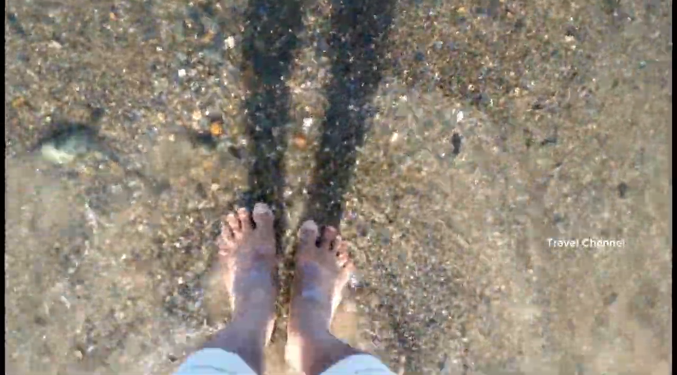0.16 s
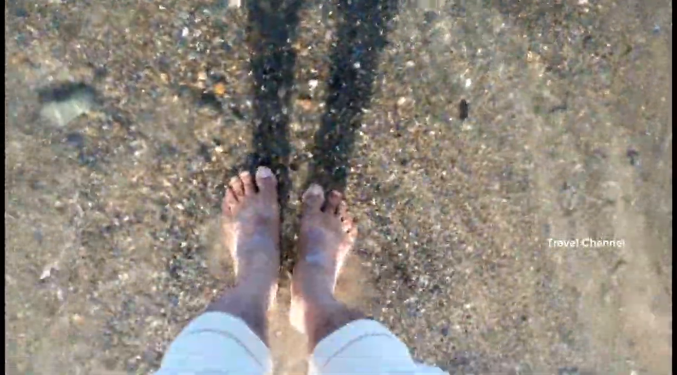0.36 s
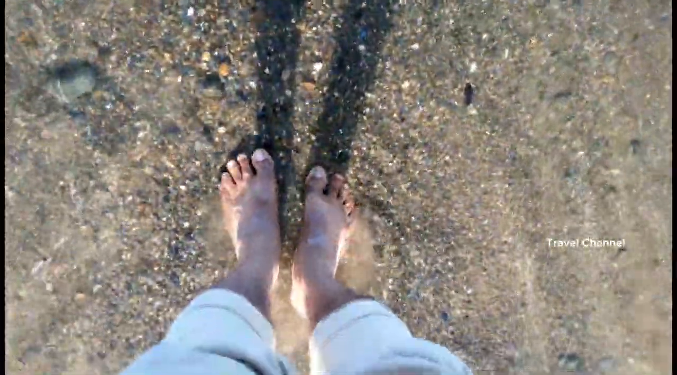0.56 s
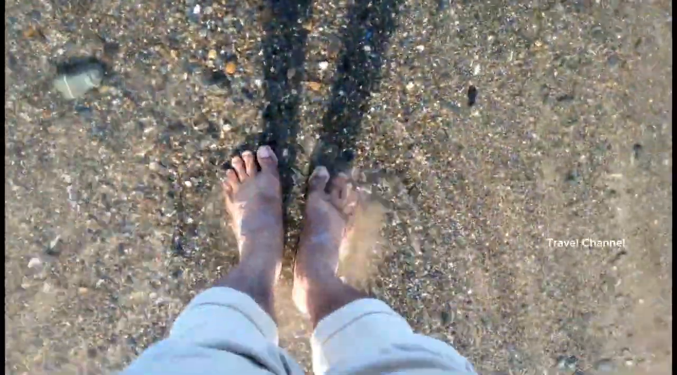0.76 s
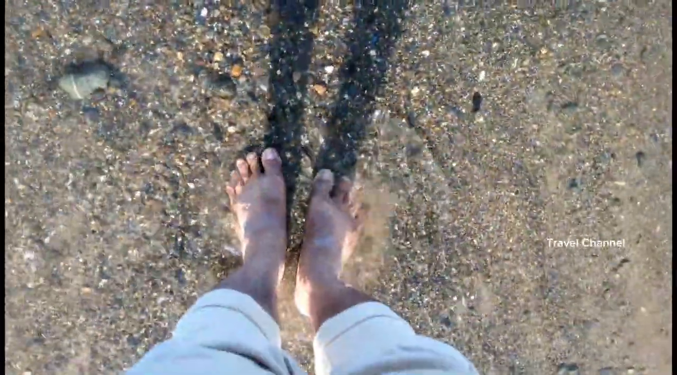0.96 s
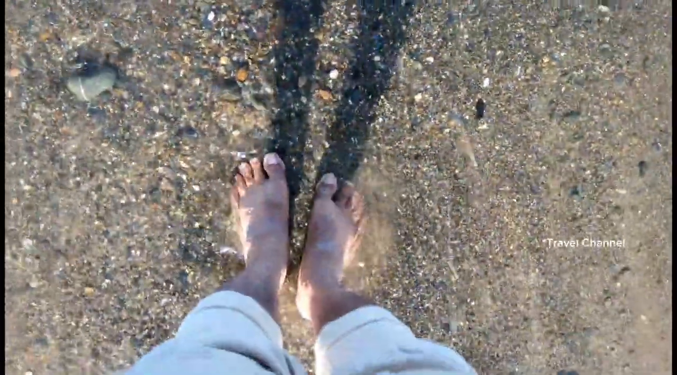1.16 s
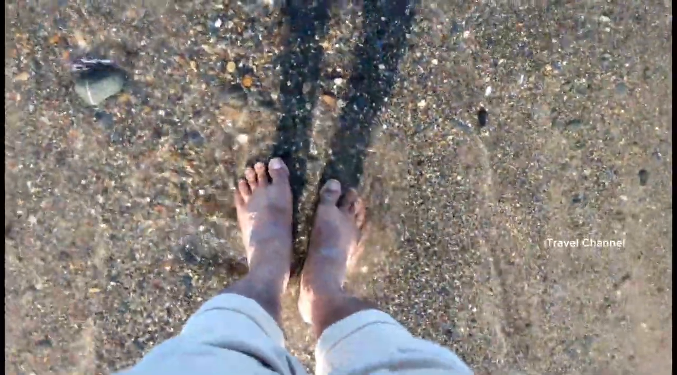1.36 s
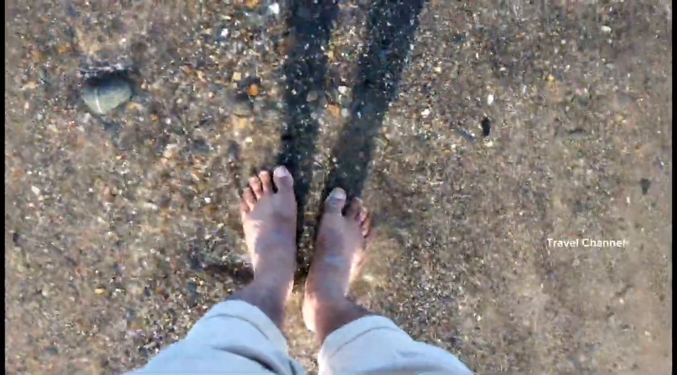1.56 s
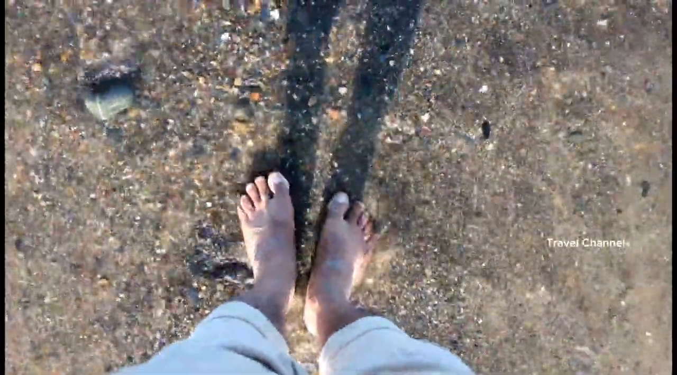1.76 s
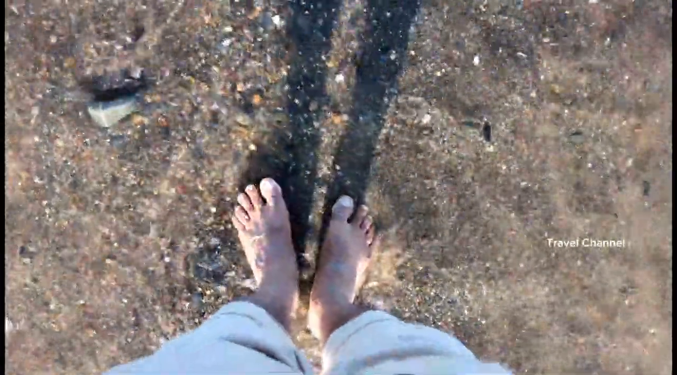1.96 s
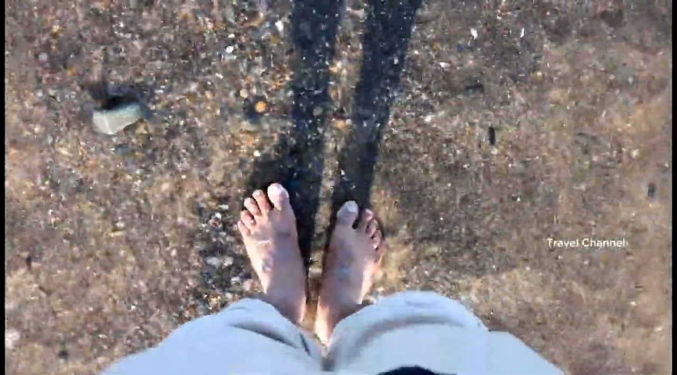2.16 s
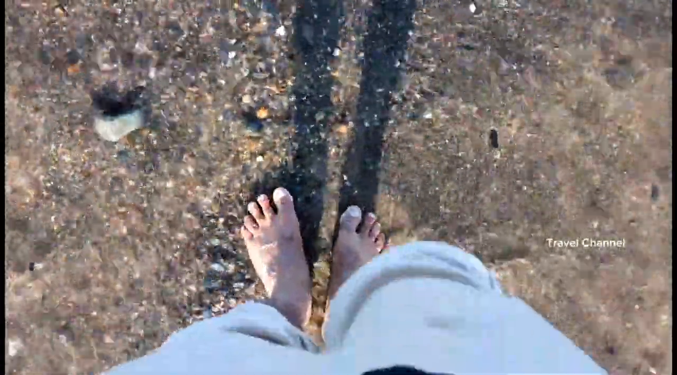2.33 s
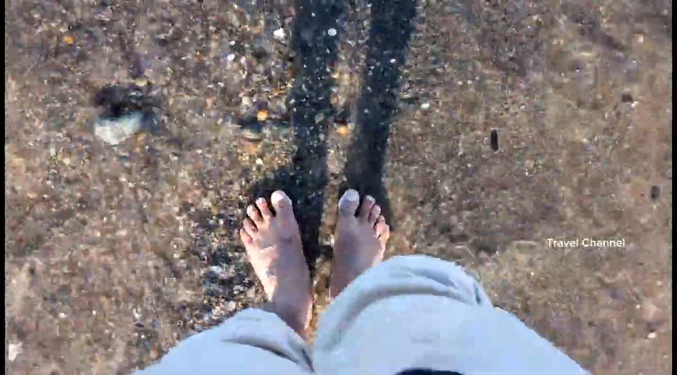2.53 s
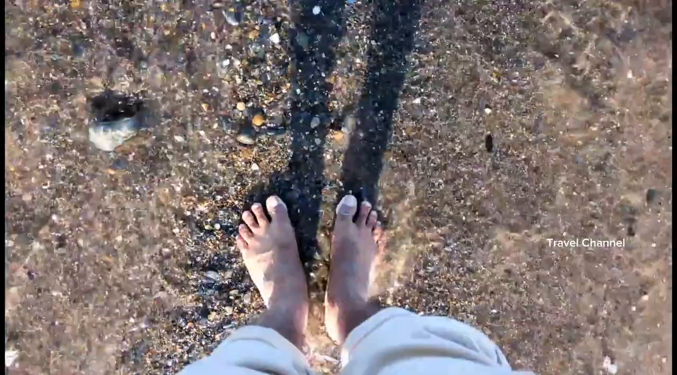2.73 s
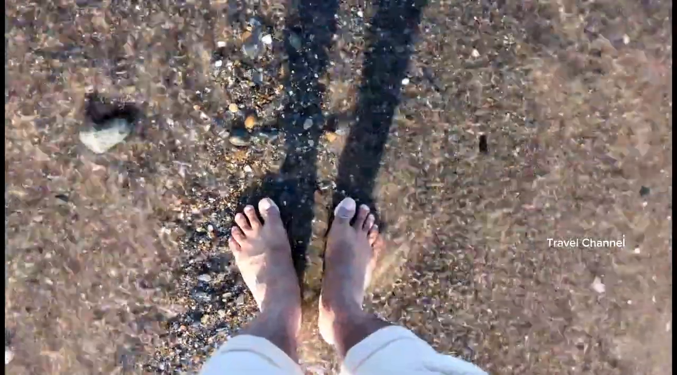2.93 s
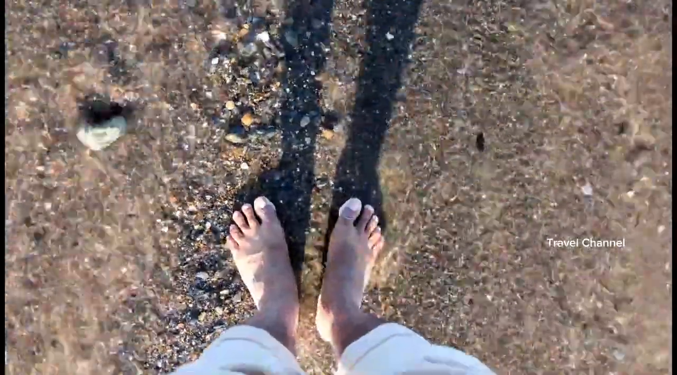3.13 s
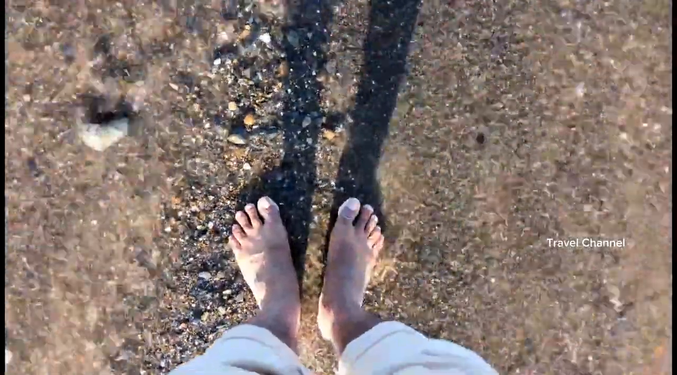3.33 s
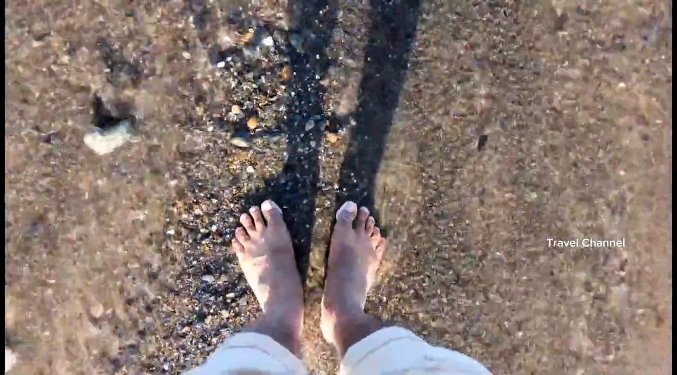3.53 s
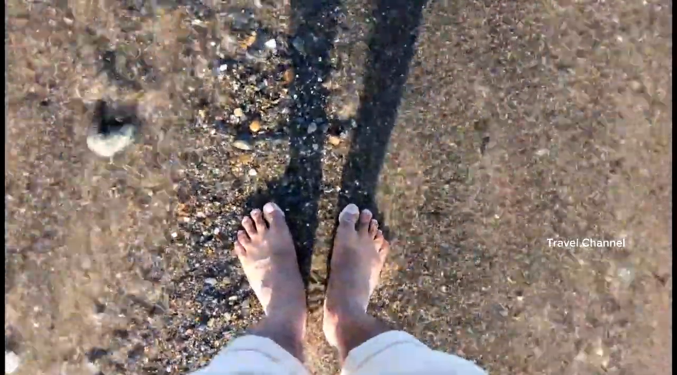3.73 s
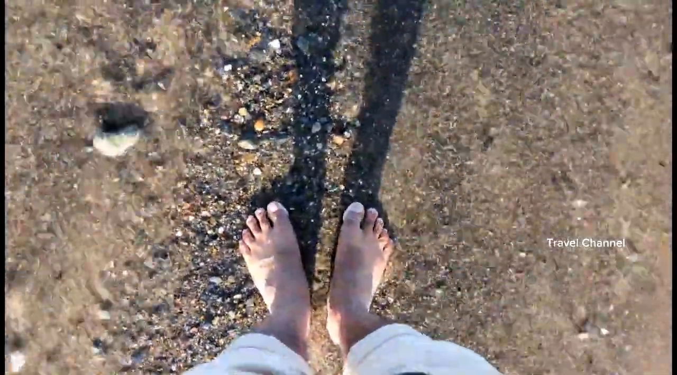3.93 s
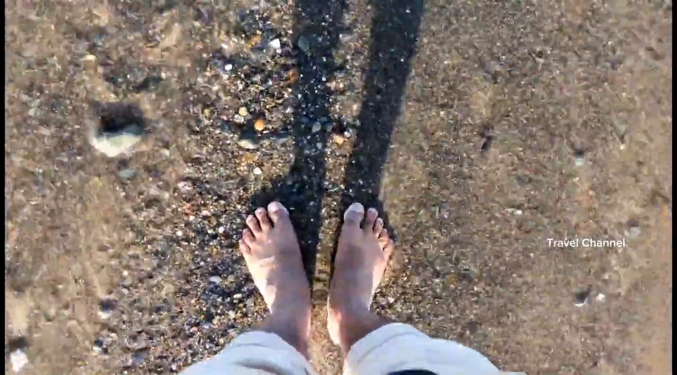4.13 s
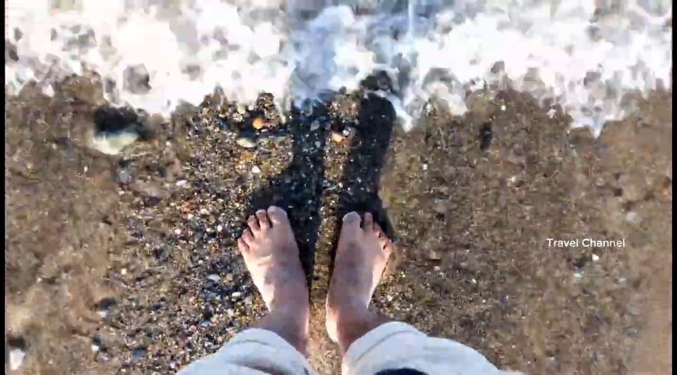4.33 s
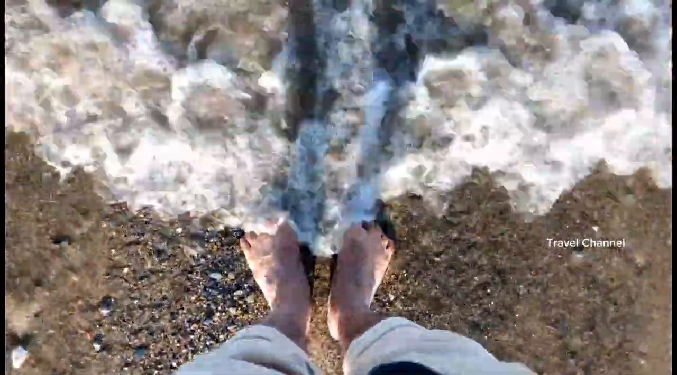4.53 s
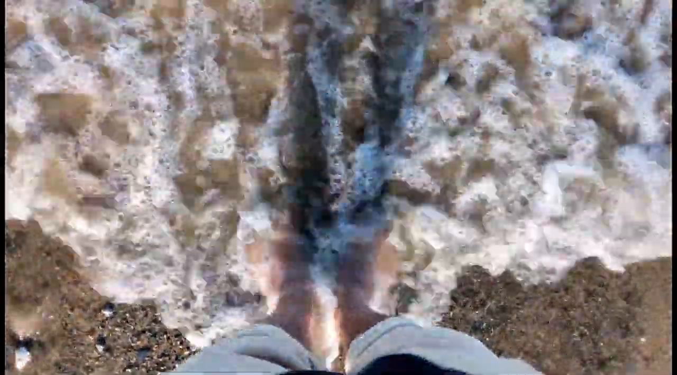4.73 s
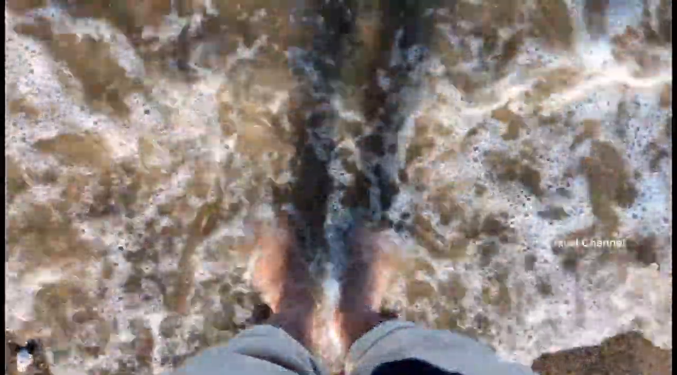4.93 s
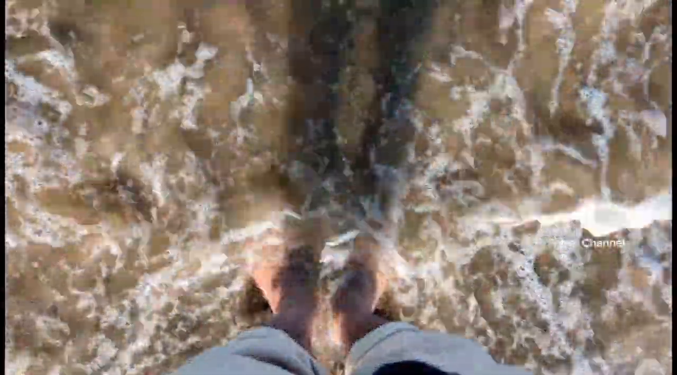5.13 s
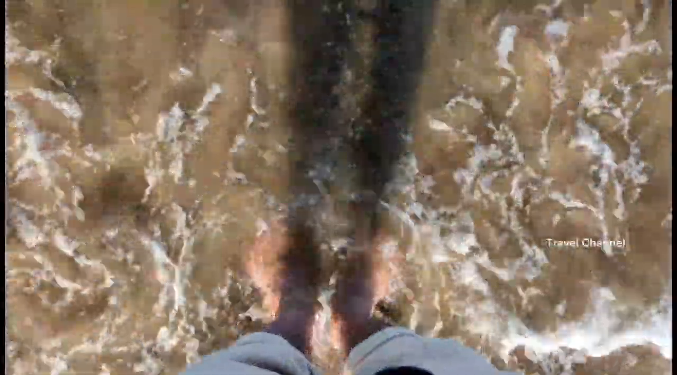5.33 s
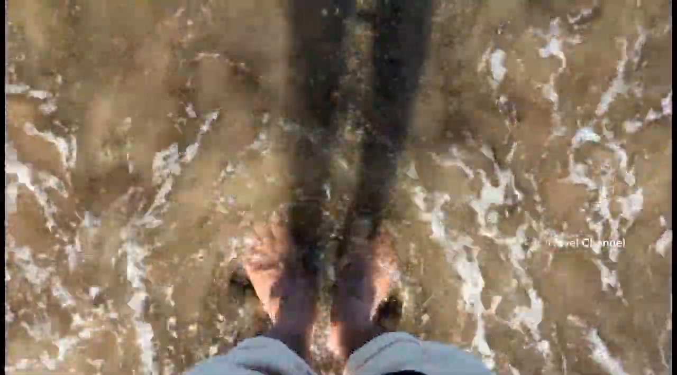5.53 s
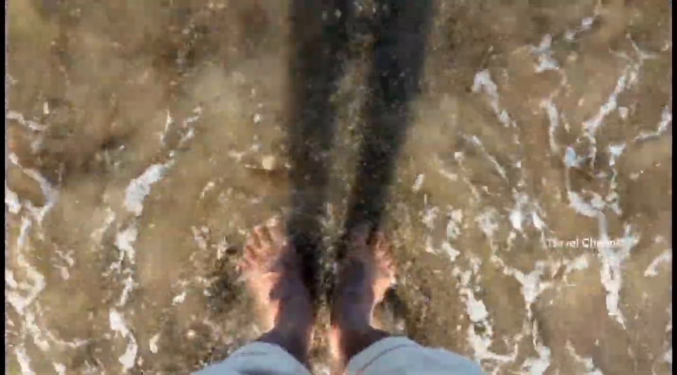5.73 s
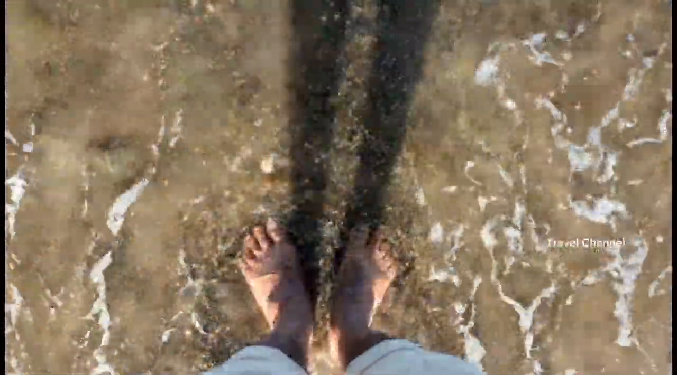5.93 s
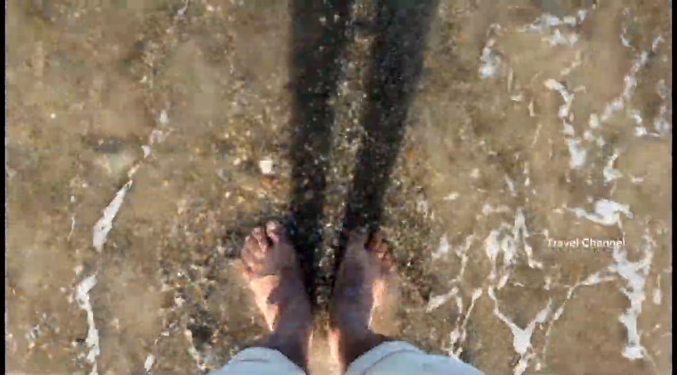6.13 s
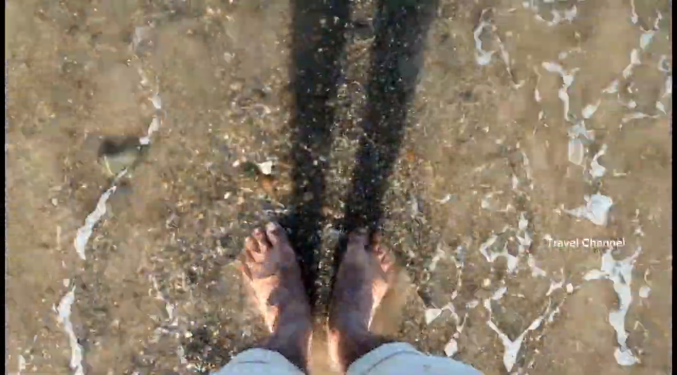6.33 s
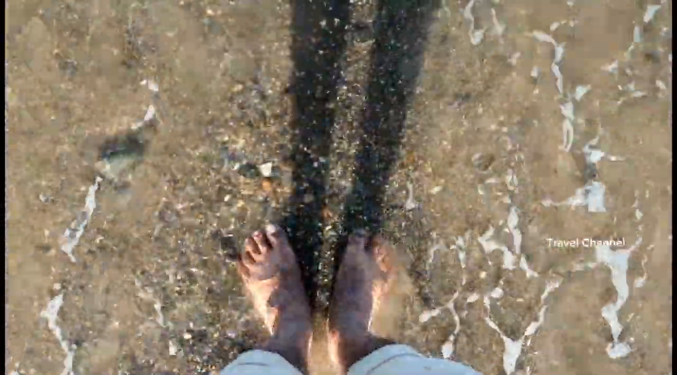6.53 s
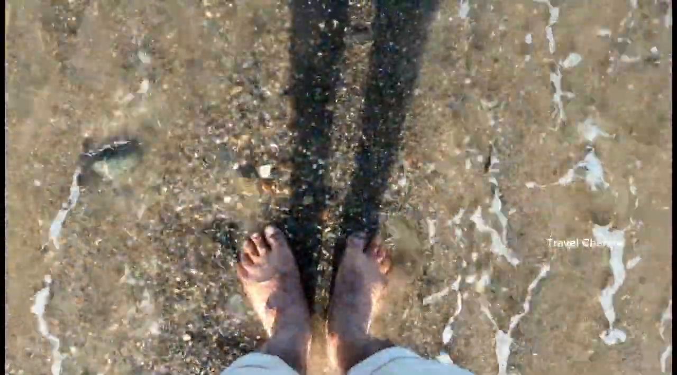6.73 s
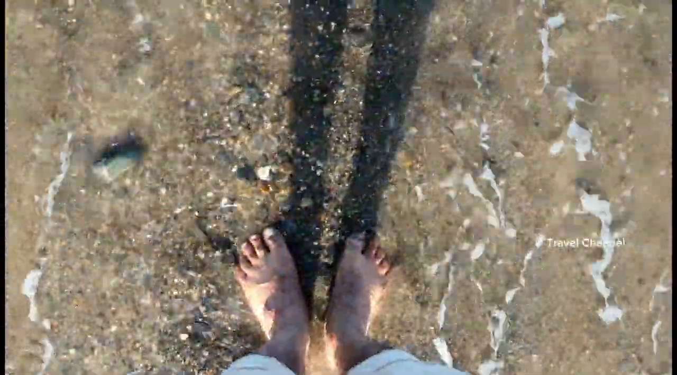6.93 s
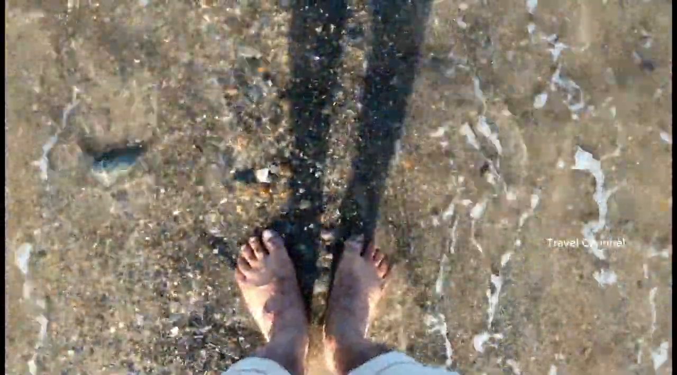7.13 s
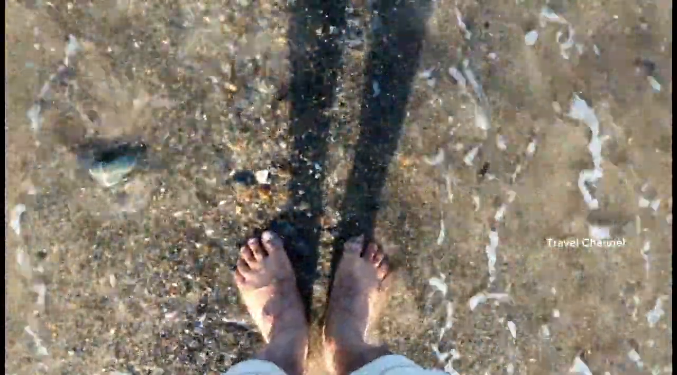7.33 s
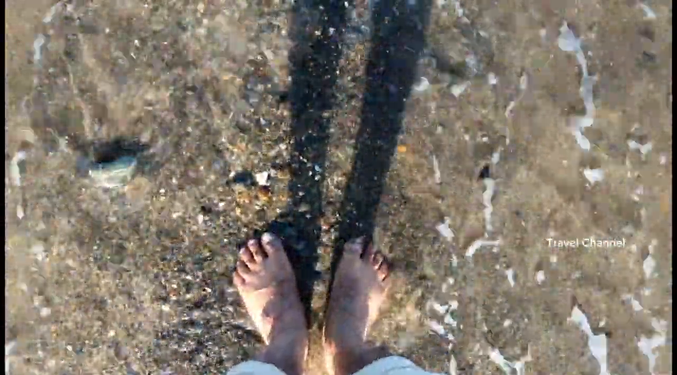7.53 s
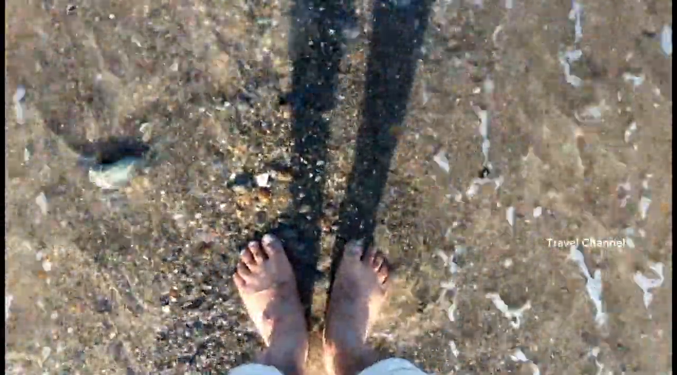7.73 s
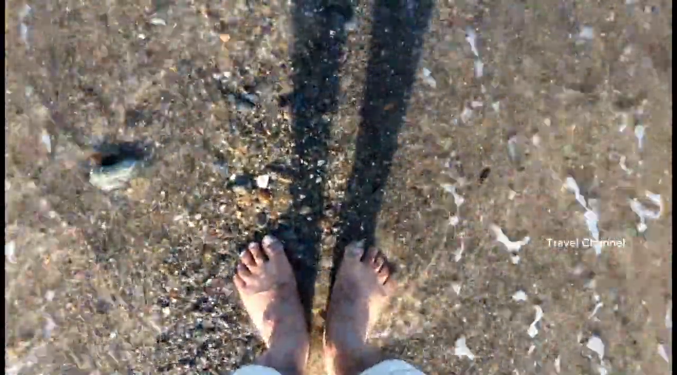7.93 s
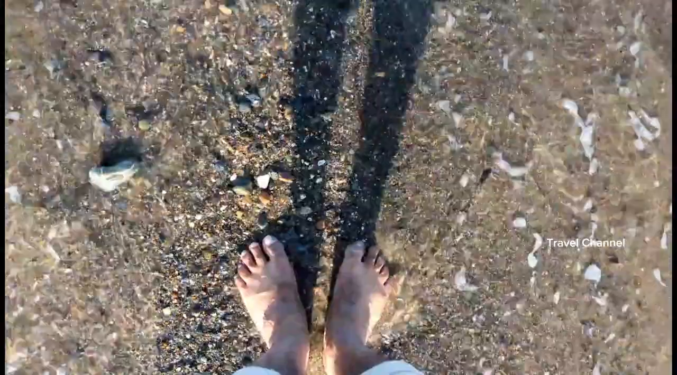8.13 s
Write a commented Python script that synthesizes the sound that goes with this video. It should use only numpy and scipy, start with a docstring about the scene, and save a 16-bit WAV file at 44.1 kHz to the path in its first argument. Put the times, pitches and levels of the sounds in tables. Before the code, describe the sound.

Shallow sea water laps and ripples softly, close to a hand-held microphone whose right side sounds muffled. For the first second and a half, a thin backwash sizzles through sand and small pebbles. Drops snap and bubbles plink here and there over a low, steady breeze rumble. From about 1.4 to 3 seconds, puffs of wind buffet the microphone, mostly on the left, ending in a thump on the right at 2.8 seconds. The drained shingle then prickles faintly. Near 3.7 seconds one small wave breaks, the loudest event, with bright spray, hollow gulps and a splash that peaks around 4 seconds, followed by a sharp tick. Foam fizzes up the shore around 5 seconds and gradually thins while gentle lapping continues. From about 7.3 seconds the water slides back as a thin, sizzling sheet with a few small plops, until just past 8 seconds.

```python
"""Ankle-deep at the edge of a calm sea. At first water laps and drains, sizzling through sand and shingle
(small pebbles), while drops snap and bubbles plink: each bubble is trapped air ringing like a tiny bell.
Puffs of wind buffet a hand-held microphone, whose right side is muffled, and the drained shingle prickles.
Near 3.7 s one small wave breaks. It runs up the shore as fizzing foam, and at last slides back
as a thin, sizzling sheet of water."""
import sys
import numpy as np
from scipy import signal
from scipy.fft import rfft, irfft, next_fast_len
from scipy.io import wavfile
from scipy.ndimage import uniform_filter1d, map_coordinates

SR = 44100
rng = np.random.default_rng(int(sys.argv[2]) if len(sys.argv) > 2 else 0)


def transcribe(signal):
    """Save signal, clipped to [-1, 1], as a 16-bit WAV file at the path in sys.argv[1]."""
    frames = np.atleast_2d(signal).T
    limited = np.clip(frames, -1, 1)
    pcm = np.round(limited * 32767).astype(np.int16)
    wavfile.write(sys.argv[1], SR, pcm)


N = 364707
TIME = np.arange(N) / SR

# how much duller the microphone's right side is than its left: f/Hz, level/dB
RIGHT_MUFFLE = [(80, 1), (200, -2.5), (400, -2.5), (680, -3.5), (900, -2), (1400, -5), (1750, -3.5),
                (2200, 1), (2700, -6), (3300, -11.5), (4200, -7.5), (6500, -22.5), (9000, -27.5),
                (14000, -43)]
# water sliding back to sea thins to a sheet: start t/s, level/dB
BACKWASHES = [(0.0, -59), (7.31, -56)]


def amp(db):
    """Turn decibels into a number to multiply by."""
    return 10 ** (np.asarray(db) / 20)


def unit(x):
    """Scale x to an average strength (rms) of 1."""
    return x / np.sqrt(np.mean(x ** 2) + 1e-20)


def along(points, hz):
    """Read between the rows of an (f/Hz, value) table, on a scale of octaves."""
    f, values = np.transpose(points)
    return np.interp(np.log(hz + 1), np.log(f + 1), values)


def wobble(per_s):
    """A smooth curve through per_s random values a second."""
    return map_coordinates(rng.standard_normal(512), [TIME * per_s], mode="wrap")


def filtered(x, response):
    """Multiply each frequency in x by response(hz)."""
    size = next_fast_len(N + 8192, True)
    return irfft(rfft(x, size) * response(np.fft.rfftfreq(size, 1 / SR)), size)[..., :N]


def shaped(x, tone):
    """Give x the tone of an (f/Hz, level/dB) table."""
    return filtered(x, lambda hz: amp(along(tone, hz)))


def rings(start_s, gain, hz, ring_s, rise):
    """Tones that fade 60 dB in ring_s and climb by the share rise, as a bubble does near the surface."""
    length = (ring_s * SR).astype(int) + 2
    which = np.repeat(np.arange(len(start_s)), length)  # the tone each sample belongs to
    age = np.arange(len(which)) - (np.cumsum(length) - length)[which]
    life = age / SR / ring_s[which]
    turns = age / SR * hz[which]
    loudness = gain[which] * np.exp(-np.log(1000) * life) * (1 - np.exp(-2 * turns))
    wave = loudness * np.sin(2 * np.pi * turns * (1 + rise[which] * life / 2))
    return np.bincount(np.abs(start_s * SR).astype(int)[which] + age, wave, N)[:N]


def swarm(low_hz, high_hz, cycles, spread_db, near_db, count):
    """Two streams of near bubbles of random size over the smooth rush of countless far ones."""
    near = []
    for when, size, strength, life in rng.random((2, count, 4)).transpose(0, 2, 1):
        hz = low_hz * (high_hz / low_hz) ** size
        gain = hz * amp(-spread_db * np.log(np.maximum(strength, 1 / 200)))
        near.append(unit(rings(when * N / SR, gain, hz, cycles * (.5 + life) / hz, 0.44 * life)))
    band_share = abs(high_hz - low_hz) * 2 / SR
    return amp(near_db) * np.sqrt(band_share) * np.array(near) + rng.standard_normal((2, N))


def churned(x, patchy_db):
    """Clumps of bubbles come and go: random loud and soft patches in time and pitch."""
    slices = signal.stft(x, nperseg=512)[2]
    patches = uniform_filter1d(rng.standard_normal(slices.shape[1:]), size=9, axis=0)
    patches = uniform_filter1d(patches, size=8, axis=1)
    return signal.istft(slices * amp(patchy_db * unit(patches)), nperseg=512)[1][:, :N]


def heard(streams, tone, right_lag_ms=0):
    """Give two streams a tone and lead them to the microphone: alike in the bass, duller on the right."""
    # how alike left and right are: f/Hz, likeness/0 to 1
    likeness = [(60, 0.88), (200, 0.9), (400, 0.91), (700, 0.63), (1200, 0.26), (2400, 0.036), (5000, .05)]

    def spread(hz):
        angle = np.arccos(np.clip(along(likeness, hz), -1, 1)) / 2
        return amp(along(tone, hz)) * [np.cos(angle), np.sin(angle)]

    def muffle_and_delay(hz):
        return amp(along(RIGHT_MUFFLE, hz)) * np.exp(-2j * np.pi * hz * right_lag_ms / 1000)

    mid, side = filtered(streams, spread)
    pair = np.array([mid + side, filtered(mid - side, muffle_and_delay)])
    return pair / np.std(pair.mean(0))


def swell(peak_s, attack_s, hold_s, fall_db_per_s):
    """Loudness that rises along a bell curve to 1 at peak_s, holds, then dies away."""
    age = TIME - peak_s
    rising = np.exp(-(np.minimum(age, 0) / attack_s) ** 2 / 2)
    return rising * amp(-fall_db_per_s * np.maximum(age - hold_s, 0))


def thin_sheet(start_s):
    """1 while the backwash runs as a thin sheet, fading to 0 before and after."""
    return swell(start_s, attack_s=0.0075, hold_s=1.36, fall_db_per_s=195)


def backwash_strength(fade_db_per_s=3.5):
    """Each sheet of water grows slowly quieter as it drains."""
    return sum(amp(db - fade_db_per_s * (TIME - s)) * thin_sheet(s) for s, db in BACKWASHES)


def foam_amount(early_s=0, gather_s=0.23, hold_s=0.17, thinning_s=0.4):
    """Foam left by each wave gathers, holds and thins with age."""
    # waves that run up the shore, the first before the sound starts: thickest foam t/s, level/dB
    run_ups = [(-0.52, -7), (5, 0)]
    amounts = []
    for s, db in run_ups:
        age = np.maximum(TIME + early_s - s - hold_s, 0)
        amounts.append(amp(db) * swell(s - early_s, gather_s, 0, 0) * (1 + age / thinning_s) ** -1.314)
    return np.max(amounts, axis=0)


def shallow_water():
    """Water laps and ripples with the strength of its flow; a thin sheet ripples less."""
    # strength of the flow around the feet: t/s, level/dB
    flow = [(0.0, -48), (0.45, -46.5), (0.8, -49), (1.45, -51.5), (2.25, -46), (2.65, -49), (3.42, -52.5),
            (4.85, -42.5), (5.25, -43), (5.55, -42), (6.05, -45), (6.65, -44.5), (6.85, -43.5), (7.1, -46),
            (7.5, -49.5), (7.78, -46), (8.27, -46.5)]
    # tones of the low lapping and the higher rippling: f/Hz, level/dB
    lap_tone = [(40, -24), (110, -6.5), (190, -5), (260, -3.5), (370, -1), (560, -2), (700, -3),
                (850, -13.5), (1300, -72), (3000, -62)]
    ripple_tone = [(400, -30), (750, -2), (950, -0.5), (1350, 2), (1650, -1.5), (1950, -5), (2250, -9),
                   (2600, -18.5), (3400, -15.5), (6000, -52)]
    lap = swarm(167.3, 833, cycles=15, spread_db=2.5, near_db=-8, count=1500)
    ripple = swarm(820, 2665, cycles=34, spread_db=2.5, near_db=-6, count=4000)
    slosh = wobble(6.3)
    flow_db = np.interp(TIME, *np.transpose(flow))
    calming_db = 1.5 * sum(thin_sheet(s) for s, _ in BACKWASHES)
    ripple_db = -50.5 + 0.71 * (flow_db - flow_db.mean()) - calming_db
    return (heard(lap, lap_tone, right_lag_ms=0.23) * amp(flow_db + 0.81 * slosh)
            + heard(ripple, ripple_tone, right_lag_ms=0.52) * amp(ripple_db + 0.28 * slosh))


def sand(stirred_db=-51.5, trickle_db=-67):
    """Each wave stirs the sand just ahead of its foam, over a steady trickle."""
    # tone of stirred sand: f/Hz, level/dB
    tone = [(1500, -18), (2600, 2.5), (3400, 2.5), (4100, -5.5), (4800, -3), (5600, -2), (7600, -10),
            (8600, -13), (12000, -19)]
    grains = churned(swarm(2320, 9600, cycles=18, spread_db=3, near_db=-4.5, count=9000), patchy_db=1.8)
    stirred = amp(stirred_db) * foam_amount(early_s=0.29) ** 0.75
    return heard(grains, tone, right_lag_ms=0.523) * np.hypot(stirred, amp(trickle_db))


def foam():
    """Tiny bubbles burst behind each wave, on the backwash and on the drained shingle."""
    # tone of fizzing foam: f/Hz, level/dB
    tone = [(3000, -16), (5500, -4), (7600, 1.5), (9400, -3), (10700, 1.5), (13000, 0), (14300, -6.5),
            (16000, -10)]
    fizz = churned(swarm(4900, 16600, cycles=12, spread_db=3, near_db=-7, count=14000), patchy_db=0.8)
    on_wave = amp(-52) * foam_amount()
    on_backwash = amp(-16.5) * backwash_strength()
    on_shingle = amp(-72) * swell(3.07, attack_s=0.5, hold_s=0.5, fall_db_per_s=30)
    return heard(fizz, tone) * np.linalg.norm([on_wave, on_backwash, on_shingle], axis=0)


def backwash():
    """A thin sheet of water sizzles through coarse sand."""
    # tone of the sizzle: f/Hz, level/dB
    tone = [(1700, -1), (2200, 7.5), (2600, -13), (3300, 4), (4000, -3.5), (5000, -15), (5750, -4),
            (6050, -9), (6500, -2), (7100, -16), (7700, -3.5), (8300, -26), (11000, -30)]
    flicker = amp(0.4 * wobble(18))
    return flicker * heard(rng.standard_normal((2, N)), tone, right_lag_ms=0.45) * backwash_strength()


def breeze(level_db=-54, swing_db=2.5):
    """A steady breeze rumbles on both sides of the microphone, wavering a little."""
    # tone of the rumble: f/Hz, level/dB
    tone = [(20, -34), (38, -10), (53, 12), (75, -5), (105, -5.5), (200, -33), (600, -76)]
    left, right, shared = unit(shaped(rng.standard_normal((3, N)), tone))
    return amp(level_db + swing_db * wobble(7)) * unit(np.array([left, right]) + 1.14 * shared)


def hiss(level_db=-74):
    """The microphone's own faint hiss."""
    tone = [(2500, -7.5), (8000, -9.5), (15000, -24)]  # f/Hz, level/dB
    return amp(level_db) * unit(shaped(rng.standard_normal((2, N)), tone))


def snaps(cycles=18):
    """Drops, bursting foam and touching pebbles ring so briefly that they snap."""
    # single snaps: t/s, level/dB, f/Hz, extra on the right before muffling/dB
    events = [(0.107, -30, 6500, -4), (0.1203, -25.5, 1530, 5), (1.715, -26, 1590, -10),
              (2.6325, -18, 6430, -11), (2.72, -27, 5600, -8), (2.9392, -32, 8000, 0),
              (3.329, -39, 9500, 0), (3.368, -31, 10500, 0), (4.3337, -4, 10900, 0)]
    s, db, hz, right_db = np.transpose(events)
    left, right = (rings(s, amp(level), hz, cycles / hz, np.zeros(len(s))) for level in (db, db + right_db))
    return np.array([left, shaped(right, RIGHT_MUFFLE)])


def plinks(ring_at_1khz_s=0.031):
    """Single bubbles ring close to the feet; large ones gulp inside the wave and ring longer."""
    # the clearest bubbles: t/s, level/dB, f/Hz, extra on the right before muffling/dB
    bubbles = [(0.361, -35, 990, -3), (0.477, -30, 276, -8), (2.052, -43, 6160, -6), (2.703, -39, 5100, -8),
               (2.722, -26, 6240, -12), (2.9393, -29.5, 2330, 4.5), (3.046, -36.5, 6400, -12),
               (3.231, -39.5, 3660, -8), (3.3672, -33, 2430, -13), (3.437, -38, 6500, -10),
               (3.69, -19, 241, -2), (3.709, -14.5, 370, -5), (3.7854, -9.5, 1280, -2),
               (3.792, -17.5, 181, 0), (3.827, -12.5, 294, -2), (3.938, -9, 288, 0), (4.161, -21, 123, -1),
               (4.535, -22, 5800, -8), (4.876, -34, 2360, 3), (5.349, -34.5, 3410, -13),
               (5.767, -30, 149, -2), (6.074, -32, 1950, -7), (6.442, -32, 393, -4),
               (7.664, -28.5, 367, -3), (7.764, -25, 400, -5), (7.939, -36.5, 3320, -12)]
    s, db, hz, right_db = np.transpose(bubbles)
    ring_s = ring_at_1khz_s * (hz / 1000) ** -0.57
    rise = np.full(len(s), 0.13)
    sides_db = db, db + right_db + along(RIGHT_MUFFLE, hz)
    return np.array([rings(s, amp(level), hz, ring_s, rise) for level in sides_db])


def wind_puffs(flutter_db=2):
    """Fluttering puffs of wind buffet the microphone, each harder on one side."""
    # puffs: t/s, half length/s, level/dB, side/0 left to 1 right
    puffs = [(0.47, 0.063, -38, 0.26), (1.396, 0.016, -40, 0.075), (1.541, 0.0088, -26.5, 0),
             (1.639, 0.029, -24.5, 0), (1.8, .018, -38, 0.44), (1.932, 0.02, -35.5, 0.12),
             (2.177, .015, -31, 0.31), (2.327, .027, -34, .13), (2.412, 0.026, -31, .03),
             (2.477, .017, -29.5, 0.084), (2.814, 0.057, -33, 0.94), (2.824, 0.0095, -28, 1),
             (4.963, 0.02, -40, 0.42), (7.32, 0.036, -42, .79)]
    # tone of the buffeting: f/Hz, level/dB
    tone = [(20, -28), (35, -5), (52, 7), (80, 2.5), (130, -10), (220, -18.5), (400, -40), (1000, -61),
            (3000, -100)]
    force = sum(amp(db) * np.exp(-((TIME - s) / half_s) ** 2 / 2) * np.array([[1 - side], [side]])
                for s, half_s, db, side in puffs)
    swirl = signal.hilbert(shaped(rng.standard_normal((2, N)), tone), next_fast_len(N))[:, :N]
    strength = np.sqrt(uniform_filter1d(np.abs(swirl) ** 2, size=1500) / 2 + 1e-12)
    even_swirl = swirl.real / strength
    return force * amp(flutter_db * wobble(24.12)) * even_swirl


def wind_slap():
    """One swirl of air slaps the right side of the microphone."""
    # the tones of the slap: t/s, level/dB, f/Hz, ring time/s
    thumps = [(2.8046, -15.5, 536, 0.0087), (2.8066, -12.5, 210, 0.021), (2.818, -7, 67.5, 0.072)]
    s, db, hz, ring_s = np.transpose(thumps)
    return np.outer([0, 1], rings(s, amp(db), hz, ring_s, np.zeros(len(s))))


def shingle_prickle(start_s=2.8, lasts_s=1.1, count=600):
    """Drained shingle prickles faintly, ever thicker until the wave covers it."""
    when, size, pitch = rng.random((count, 3)).T
    ticks = rings(start_s + lasts_s * np.sqrt(when), gain=amp(-47 + 11 * size ** 2),
                  hz=4200 + 7000 * pitch ** 2, ring_s=0.0013 * (0.5 + size), rise=pitch)
    return np.array([ticks, shaped(ticks, RIGHT_MUFFLE)])


def breaking_wave(spill_s=3.6, break_s=3.75, slam_half_s=0.042):
    """The wave's lip spills and folds over: spray bursts out, air pockets gulp and the front splashes."""
    # tones of the lip's droplets, the spray, the trapped air and the splash: f/Hz, level/dB
    lip_tone = [(900, -17), (1700, -2), (2150, 0.5), (2700, -6), (3500, -10), (4300, -19), (6000, -12.5),
                (9000, -20), (15000, -28)]
    spray_tone = [(1500, -6.5), (3500, 3.5), (4400, -6.5), (5100, 1.5), (6700, 2), (7600, 1.5), (8500, -3),
                  (9600, -2.5), (10500, 1), (13000, 0.5), (14300, -12), (16000, -10)]
    air_tone = [(35, -40), (80, -10), (125, -5.5), (190, 1), (300, 3.5), (440, 2.5), (580, -6.5),
                (850, -2.5), (2000, -41)]
    splash_tone = [(250, -29), (520, 3.5), (720, 2.5), (920, -0.5), (1350, 1), (1700, -0.5), (2200, -3),
                   (2650, -6.5), (3400, -16), (4200, -15), (8000, -19)]
    # parts of the crest slam down: t/s, extra level/dB
    slams = [(3.795, 1.5), (4.06, 4)]
    lip = churned(swarm(1410, 8600, cycles=29, spread_db=3.5, near_db=4.5, count=4000), 3.5)
    air = swarm(118, 710, cycles=9.5, spread_db=1, near_db=-1, count=2200)
    splash = churned(swarm(580, 3400, cycles=17.4, spread_db=2.5, near_db=-7.5, count=8000), 1.5)
    spray = churned(swarm(3225, 14900, cycles=37, spread_db=4.5, near_db=-6.5, count=16000), 0.54)
    tumble = wobble(28)
    slam_db = sum(db * np.exp(-((TIME - s) / slam_half_s) ** 2 / 2) for s, db in slams)
    lip = heard(lip, lip_tone) * amp(-43.5)
    spray = heard(spray, spray_tone) * amp(-35.5 + 0.8 * slam_db + 0.67 * tumble)
    air = heard(air, air_tone, right_lag_ms=0.033) * amp(-28 + 0.5 * slam_db + 0.5 * wobble(21.9))
    splash = heard(splash, splash_tone, right_lag_ms=-0.095) * amp(-28 + slam_db + 0.55 * tumble)
    return (lip * swell(spill_s, attack_s=0.14, hold_s=0.11, fall_db_per_s=80)
            + spray * swell(break_s, attack_s=0.069, hold_s=0.5, fall_db_per_s=42)
            + air * swell(break_s + 0.12, attack_s=0.16, hold_s=0.28, fall_db_per_s=24.5)
            + splash * swell(break_s + 0.13, attack_s=0.16, hold_s=0.44, fall_db_per_s=27.5))


def scene():
    """Water, wind and hiss added together, left and right."""
    water = shallow_water() + sand() + foam() + backwash() + breaking_wave()
    small_sounds = snaps() + plinks() + shingle_prickle()
    return water + small_sounds + wind_puffs() + breeze() + wind_slap() + hiss()


def record(dry, low_cut_hz=39, top_hz=15950):
    """The recorder cuts the deepest wind rumble and the very highest treble."""
    lean = signal.sosfilt(signal.butter(4, low_cut_hz, "highpass", fs=SR, output="sos"), dry)
    return filtered(lean, lambda hz: hz < top_hz)


dry = scene()
out = record(dry)
transcribe(out)
```